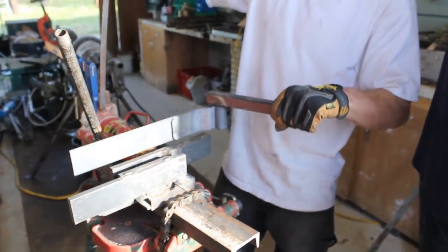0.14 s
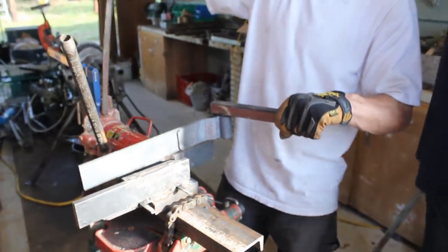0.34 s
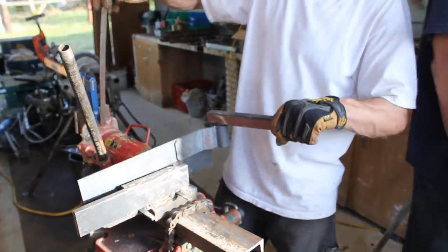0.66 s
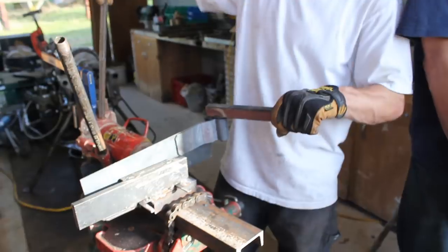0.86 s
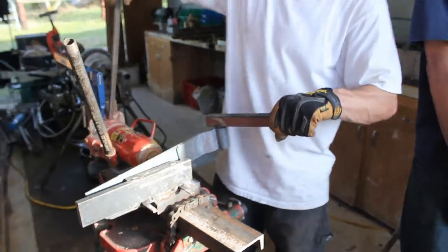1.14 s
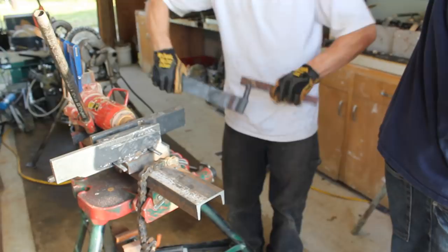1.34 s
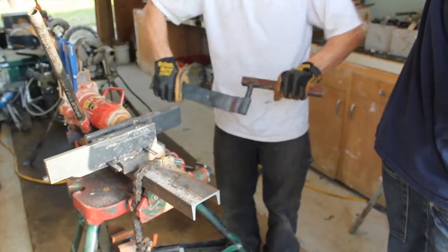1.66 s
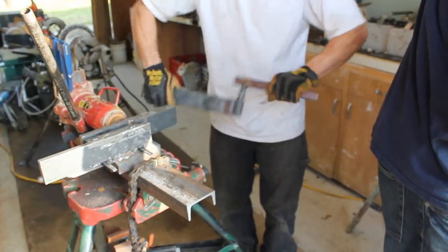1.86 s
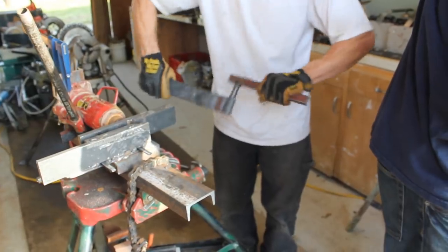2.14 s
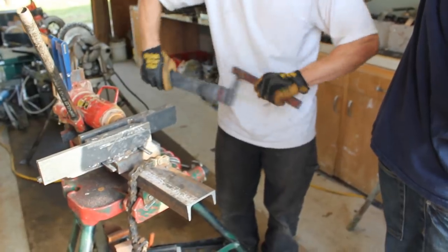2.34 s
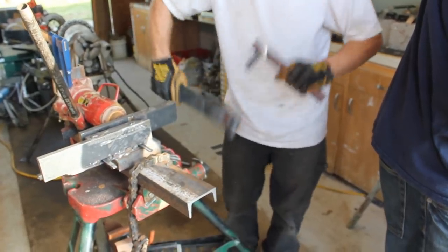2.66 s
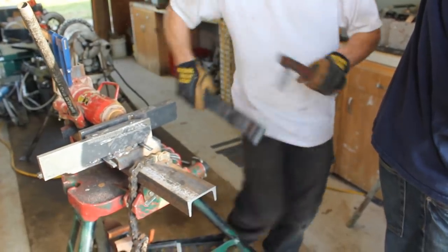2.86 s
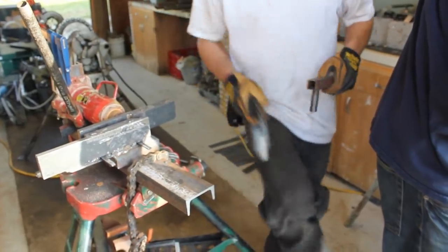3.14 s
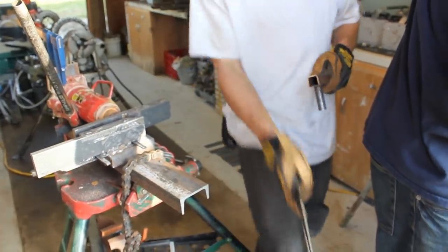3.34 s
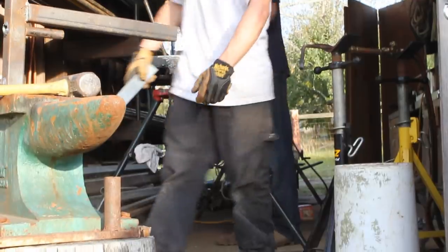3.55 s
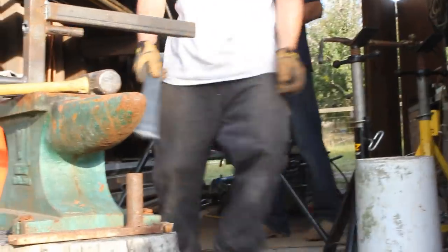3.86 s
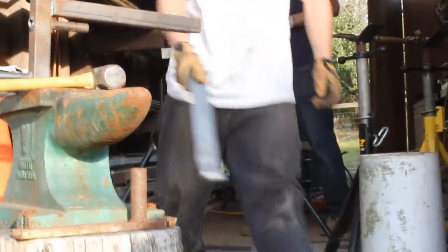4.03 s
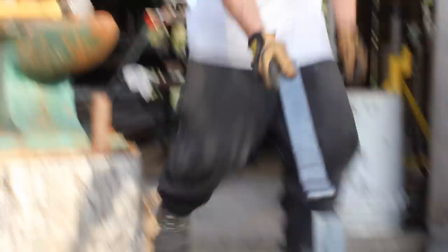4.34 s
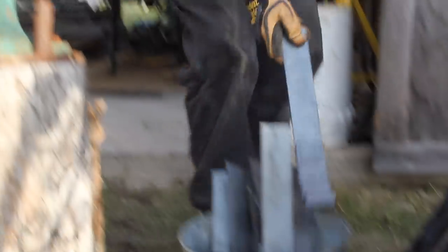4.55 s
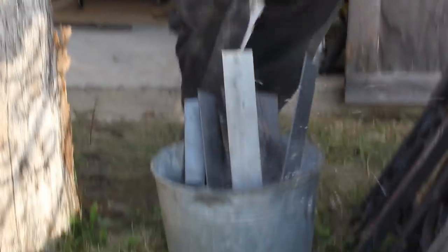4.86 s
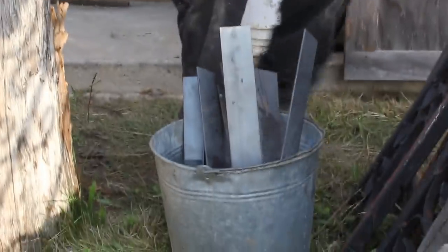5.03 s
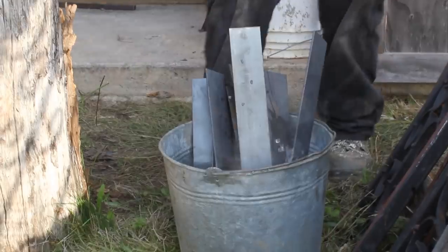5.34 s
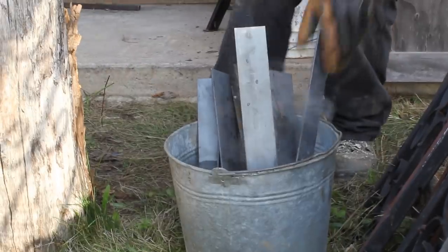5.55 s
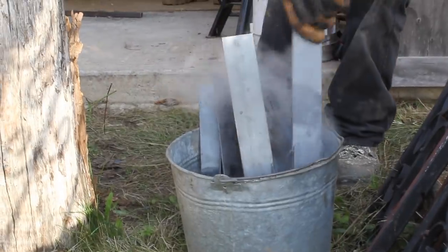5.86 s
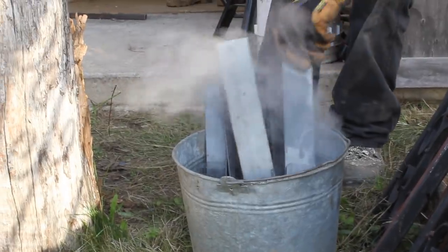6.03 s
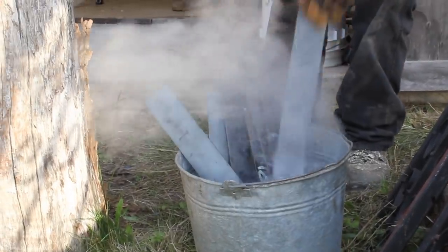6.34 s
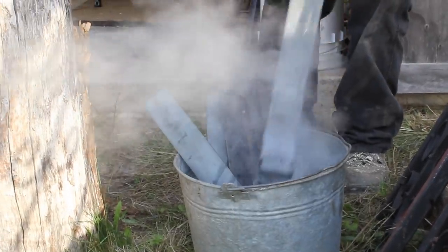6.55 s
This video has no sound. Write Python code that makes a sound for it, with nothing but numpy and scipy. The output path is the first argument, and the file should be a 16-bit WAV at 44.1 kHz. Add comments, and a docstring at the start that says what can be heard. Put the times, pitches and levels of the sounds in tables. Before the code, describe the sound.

After a steady gas jet stops abruptly, hot steel hisses, bubbles and crackles in water, knocking against a metal bucket.

```python
"""A workshop, close to a metal bucket of water, heard through one microphone. A loud gas jet hisses;
an edit cuts to water spitting faintly on hot steel. The steel is plunged in: a flash of steam,
swelling boil and sizzle, knocks on the bucket that duck the hiss, short squeals as the vapour film
flutters and sputters as it collapses. Another edit cuts from the boiling to a quiet hum with a few
light taps of tools."""
import sys
import numpy as np
from scipy import signal
from scipy.fft import rfft, irfft
from scipy.io import wavfile

SR = 44100
rng = np.random.default_rng(int(sys.argv[2]) if len(sys.argv) > 2 else 0)


def waveform_to_disk(signal):
    """Save audio, clipped to [-1, 1], as 16-bit WAV at the path in sys.argv[1]."""
    frames = np.transpose(np.atleast_2d(signal))
    scaled = np.clip(frames, -1, 1) * 32767
    samples = np.round(scaled).astype(np.int16)
    wavfile.write(sys.argv[1], SR, samples)


N = 295470
TIME = np.arange(N) / SR
FREQ = np.arange(N // 2 + 1) * SR / N + 1e-3
CUT_TO_WORK_S, FLASH_S, PLUNGE_S, CUT_TO_QUIET_S = 1.043, 2.1618, 2.324, 5.514

# hiss of escaping steam: f/Hz, relative level/dB
STEAM_SPECTRUM = [(4500, -4.5), (6500, -4), (8200, -3.5), (10000, -2), (12500, 0), (14000, -3.5),
                  (15800, -6.5)]
# steel striking the bucket: t/s, strength/dB, thud relative to strength/dB, clatter t60/s
BUCKET_KNOCKS = [(2.328, -27, -7, 0.11), (3.4181, -11.5, -25, .15), (3.686, -19, -30, 0.084),
                 (3.7421, -5.5, -19, 0.073), (4.227, -17.5, -5.5, 0.29), (4.2617, -12, -14.5, 0.079),
                 (4.364, -38, -23, 0.056), (4.6, -11, -12, 0.079), (4.6392, -23, -14, 0.16),
                 (5.267, -30, -10, .04)]


def from_db(db):
    """Decibels to gain."""
    return 10 ** (np.asarray(db) / 20)


def rms_one(x):
    """Scale to unit rms."""
    return x / np.sqrt(np.mean(x ** 2) + 1e-20)


def gains(rows):
    """One gain curve over time for each dB column."""
    times, *columns = np.transpose(rows)
    return [from_db(np.interp(TIME, np.sort(times), db)) for db in columns]


def white():
    """Fresh white noise."""
    return rng.standard_normal(N)


def drift(rate_hz):
    """A random wavering of unit rms, mostly slower than rate_hz."""
    knots = rng.standard_normal(4000)
    return rms_one(np.interp(TIME * rate_hz * 2, np.arange(len(knots)), knots))


def bell(hz, width_hz):
    """Gain of a steep-sided resonance."""
    return 1 / (1 + ((FREQ ** 2 - hz ** 2) / (np.pi / 2 * FREQ * width_hz)) ** 2)


def shape(spectrum, peaks=()):
    """Gain by frequency: a broad spectrum, lifted by resonances."""
    hz, db = np.transpose(spectrum)
    roll_off = np.minimum(1, np.minimum(FREQ / hz[0], hz[-1] / FREQ)) ** 2
    lift_db = sum(lift * np.exp(-np.minimum((2 * (FREQ - centre) / width) ** 2 * np.log(2), 20))
                  for centre, width, lift in peaks)
    return roll_off * from_db(np.interp(np.log(FREQ), np.log(hz), db) + lift_db)


def colour(x, response):
    """Filter a steady source and scale it to unit rms."""
    return rms_one(irfft(rfft(x) * response, N))


def gate(start, end, edge_s):
    """On between two moments, with sloping edges."""
    return np.clip(np.minimum(TIME - start, end - TIME) / edge_s + .5, 0, 1)


def decay(start, t60):
    """A sudden rise that dies away."""
    out, first = np.zeros(N), int(start * SR)
    age = TIME[:min(SR, N - first)]
    rise = 1 - np.exp(-age / .0004)
    out[first:first + len(age)] = rise * np.exp(-np.log(1000) * age / t60)
    return out


def swell(start, attack_s, hold_s, fall_db_per_s):
    """Attack, hold, and a release that falls evenly in dB."""
    age = TIME - start
    return np.clip(age / attack_s, 0, 1) * from_db(-fall_db_per_s * np.maximum(age - hold_s, 0))


def reflections(share, decay_s):
    """Nearby hard surfaces comb the spectrum with a fine ripple."""
    echoes = white() * np.exp(-TIME / decay_s)
    return 1 + share * rfft(echoes / np.sqrt(np.sum(echoes ** 2)))


def bubbles(per_s, spread_db, rush):
    """Tiny bubbles burst in random clumps around a base rate, over a smooth rush."""
    born = rng.random(N) < per_s * from_db(3 * drift(40)) / SR
    sizes = from_db(spread_db * np.minimum(rng.exponential(1, N), 4)) * rng.choice([-1, 1], N)
    return rms_one(born * sizes) + rush * white()


def quiet_room():
    """Room tone after the second cut: faint air, a thin high hiss and a wavering mains hum."""
    # the still room: f/Hz, relative level/dB
    spectrum = [(18, -54), (30, -33), (59, -15), (117, -10), (130, -12), (141, -13), (174, -15.5),
                (402, -16.5), (483, -20.5), (1610, -25), (3280, -30), (4490, -25), (5390, -31),
                (12800, -34.5), (15800, -33.5)]
    # its two bands: t/s, low level/dB, high level/dB
    band_levels = [(5.52, -57.5, -55), (5.85, -54.5, -54.5), (6.1, -55.5, -54.5), (6.7, -52, -55.5)]
    low_level, high_level = gains(band_levels)
    treble_share = 1 / (1 + (2500 / FREQ) ** 4)
    air = low_level * colour(white(), shape(spectrum) * np.sqrt(1 - treble_share))
    hiss = high_level * colour(white(), shape(spectrum, [(4600, 420, 3)]) * np.sqrt(treble_share))
    hum = from_db(-58 + 2.2 * drift(8)) * np.sin(2 * np.pi * 117.5 * TIME + 0.85 * drift(4.9))
    return air + hiss + hum


def working_room():
    """Room tone behind the steel: air and a beating machine hum."""
    # workshop air: f/Hz, relative level/dB
    spectrum = [(18, -52), (30, -35), (71, -5.5), (156, -3), (220, -8.5), (309, -8.5), (392, -9.5),
                (459, -8), (581, -11.5), (1240, -5.5), (2730, -15.5), (4370, -22.5), (11500, -33.5),
                (15800, -36)]
    # machine tones: f/Hz, level/dB
    tones = [(70.5, -55), (78, -56.5)]
    air = from_db(-41.5) * colour(white(), shape(spectrum))
    hum = sum(from_db(db) * np.sqrt(2) * np.sin(2 * np.pi * hz * TIME + 0.93 * drift(1.5))
              for hz, db in tones)
    return air + hum


def tool_taps():
    """Short dull rustles and ticks of tools being handled."""
    # light contacts: t/s, level/dB, f/Hz, t60/s
    taps = [(1.111, -35.5, 3200, 0.22), (1.12, -35, 220, 0.32), (1.668, -34.5, 169, 0.3),
            (1.712, -35.5, 2780, 0.074), (1.735, -39, 3000, 0.076), (1.761, -22, 9100, 0.014),
            (2.031, -39, 2200, 0.25), (2.11, -35, 700, 0.069), (5.943, -52.5, 3000, 0.27),
            (6.251, -48.5, 2400, .09), (6.474, -51, 1500, .12)]
    source = rfft(white())
    return sum(from_db(db) * decay(start, t60) * rms_one(irfft(source * bell(hz, 0.86 * hz), N))
               for start, db, hz, t60 in taps)


def gas_jet():
    """Turbulent gas noise with steady resonances, coloured by nearby surfaces."""
    # strength of the jet: t/s, level/dB
    levels = [(0.02, -16), (0.222, -17), (0.266, -15.5), (0.924, -17), (1.02, -15.5)]
    # turbulence: f/Hz, relative level/dB
    spectrum = [(40, -38), (90, -25), (140, -9), (205, -12.5), (250, -4.5), (420, -9), (560, -1), (730, -7),
                (1400, -7.5), (1800, -5.5), (2100, -6.5), (5500, -8), (8000, -5.5), (12600, 0), (15800, -5)]
    # resonances: f/Hz, width/Hz, lift/dB
    peaks = [(255, 40, 8), (307, 25, 6), (352, 28, 10), (496, 38, 10.5), (628, 45, 7), (685, 20, 5),
             (826, 32, 10), (975, 80, 6), (1084, 28, 13), (1230, 35, 5), (1315, 28, 7), (1530, 35, 5),
             (1620, 25, 7), (1700, 24, 12), (2160, 28, 8), (2320, 50, 7), (2495, 100, 7), (3012, 36, 10),
             (3260, 40, 7), (3780, 45, 6), (4020, 50, 7), (5990, 36, 8)]
    level, = gains(levels)
    ripple = reflections(share=.25, decay_s=.025)
    return level * colour(white(), shape(spectrum, peaks) * ripple)


def spitting():
    """Water spits on the hot steel in fits, with a faint fizz between them."""
    # fits before the plunge: t/s, length/s, level/dB
    fits = [(1.09, 0.11, -44.5), (1.303, .07, -45.5), (1.397, .21, -42.5), (1.703, .1, -49),
            (1.98, .08, -43.5), (2.09, 0.018, -44)]
    # spitting water: f/Hz, relative level/dB
    spectrum = [(1180, -33), (2000, -13), (3000, -16), (3330, -7), (4100, -6), (7510, -6.5), (14200, -2.5),
                (15800, -9)]
    envelopes = [from_db(db) * swell(start, 0.017, length, fall_db_per_s=110)
                 for start, length, db in fits]
    level = np.hypot(np.max(envelopes, axis=0), from_db(-56))
    return level * colour(bubbles(per_s=3000, spread_db=5, rush=0.99), shape(spectrum))


def steam_flash():
    """First contact boils the water explosively: a roar, ringing steel, a hollow splash, a thump."""
    # roar of steam: f/Hz, relative level/dB
    roar_spectrum = [(59, -64), (100, -37), (261, -13), (434, -14), (505, -11.5), (657, -22.5), (808, -10),
                     (1050, 0), (1220, -13), (1560, -3), (2550, -3.5), (2800, 0), (9000, -17), (11700, -48),
                     (19800, -120)]
    # ringing of the shocked steel: f/Hz, width/Hz, lift/dB
    steel_peaks = [(6130, 300, 7), (6830, 250, 5), (8250, 200, 8), (9950, 140, 2), (10600, 170, 11),
                   (11940, 330, 17), (13140, 350, 10), (14560, 120, 5)]
    fizz_spectrum = [(3500, -6), (6000, -7), (9000, -10), (13000, -12), (15800, -16)]
    attack_s = 0.0026
    roar_level = from_db(-14) * swell(FLASH_S, attack_s, hold_s=0.039, fall_db_per_s=251)
    fizz_level = from_db(-21) * swell(FLASH_S, attack_s, hold_s=0.04, fall_db_per_s=800)
    crack_level = from_db(-8.5) * decay(FLASH_S + attack_s / 2, t60=0.035)
    roar = roar_level * colour(white(), shape(roar_spectrum, [(3600, 330, 2.7), (4540, 600, 7.4)]))
    fizz = (fizz_level + crack_level) * colour(white(), shape(fizz_spectrum, steel_peaks))
    wisp = from_db(-36) * swell(FLASH_S, .02, 0.095, 100) * colour(white(), shape(STEAM_SPECTRUM))
    splash = from_db(-28) * swell(2.19, 0.0043, 0.087, 400) * colour(white(), bell(940, 640))
    thump = from_db(-20) * decay(FLASH_S + attack_s, t60=0.026) * colour(white(), bell(260, 330))
    return roar * from_db(1.5 * drift(70)) + fizz + wisp + splash + thump


def vapour_bursts():
    """The vapour film collapses in fits, from broad sputters to held hollow notes."""
    # collapses: t/s, length/s, f/Hz, width/Hz, level before wavering/dB
    bursts = [(2.192, 0.015, 840, 450, -25), (2.207, 0.024, 3040, 800, -20.5),
              (2.55, 0.72, 4380, 380, -35.5), (2.596, 0.69, 1550, 150, -37),
              (3.103, 0.18, 3100, 500, -32.5), (3.375, 0.034, 1400, 1800, -28),
              (3.421, 0.037, 1200, 600, -23.5), (3.93, 0.15, 5550, 500, -31),
              (3.93, 0.12, 3530, 250, -32.5), (4.259, .025, 1650, 800, -19), (4.451, 0.012, 4500, 500, -22),
              (4.542, 0.066, 3870, 4400, -19.5), (4.582, 0.018, 3180, 604, -20.5),
              (4.747, 0.61, 1210, 220, -37.5), (4.777, 0.54, 3680, 400, -35.5),
              (4.934, 0.023, 1920, 1000, -24), (5.04, 0.041, 3550, 2210, -23.5),
              (5.153, 0.031, 3020, 3000, -26), (5.17, 0.52, 190, 150, -42), (5.263, 0.012, 2320, 900, -21),
              (5.335, 0.024, 3600, 1200, -30), (5.451, 0.017, 2980, 1500, -22.5),
              (5.503, 0.012, 1610, 1200, -24.5)]
    out, source = np.zeros(N), rfft(white())
    waver_db_per_s = 2.8 * drift(18)   # longer bursts waver more
    for start, length, hz, width_hz, db in bursts:
        window = gate(start, start + length, 0.011) * from_db(waver_db_per_s * length)
        tone = irfft(source * bell(hz, width_hz), N) * window
        out += from_db(db) * tone * np.sqrt(np.sum(window ** 2) / np.sum(tone ** 2))
    return out


def steel_squeals():
    """When the vapour film flutters evenly, the steel sings a slightly unsteady note."""
    # squeals: t/s, length/s, f/Hz, level/dB
    notes = [(4.028, .007, 3480, -19), (4.544, 0.026, 4580, -23.5), (4.555, .015, 10600, -28),
             (4.577, 0.023, 4900, -17.5), (4.581, 0.019, 7940, -19.5)]
    flutter = .004 * drift(150)
    clock = TIME + np.cumsum(flutter) / SR
    return sum(from_db(db) * np.sqrt(2) * gate(t, t + length, 0.0036) * np.sin(2 * np.pi * hz * clock)
               for t, length, hz, db in notes)


def bucket_knocks():
    """Each knock is a crack, a duller clatter, a thud in the water and the damped ring of the wall."""
    # steel on the bucket: f/Hz, relative level/dB
    spectrum = [(150, -13), (300, -11), (550, -5.5), (950, -2.5), (1700, -2), (2200, -4.5), (3200, -2.5),
                (5000, -7), (8000, -9), (15000, -14)]
    # ringing of the wall: f/Hz, relative level/dB, t60/s
    wall_modes = [(335, -19, 0.1), (593, -17, 0.19), (837, -13.5, 0.11), (950, -10, 0.16),
                  (1201, -12.5, 0.16), (1690, -7, 0.065), (2730, -26, 0.01), (3450, -3, 0.027)]
    crack = from_db(4) * colour(white(), shape(spectrum))
    clatter = from_db(-1) * colour(white(), shape(spectrum) / np.hypot(1, FREQ / 3000))
    water = colour(white(), bell(330, 166))
    out, blows = np.zeros(N), np.zeros(N)
    for start, db, thud_db, t60 in BUCKET_KNOCKS:
        thud = from_db(thud_db) * water * decay(start, 0.11)
        out += from_db(db) * (crack * decay(start, 0.019) + clatter * decay(start, t60) + thud)
        blows[int(start * SR)] = from_db(db)
    for hz, db, t60 in wall_modes:
        radius, angle = np.exp(-np.log(1000) / (t60 * SR)), 2 * np.pi * hz / SR
        drive = blows * from_db(db + 1.24 * white()) * rng.choice([-1, 1]) + 1e-18
        out += signal.lfilter([0, np.sin(angle)], [1, -2 * radius * np.cos(angle), radius ** 2], drive)
    low_cut = signal.butter(2, 190, "high", fs=SR, output="sos")   # a small bucket radiates no bass
    return signal.sosfilt(low_cut, out)


def wander(x, depth_db, width_hz, hold_s):
    """Resonances come and go as the cavities of vapour change shape."""
    hz, times, spectra = signal.stft(x, SR, nperseg=1024)
    field = rng.standard_normal(spectra.shape)
    for axis, pole in enumerate([np.exp(-hz[1] / width_hz), np.exp(-times[1] / hold_s)]):
        field = signal.filtfilt([1 - pole], [1, -pole], field, axis=axis, padtype="even")
    gain = from_db(depth_db * np.clip(rms_one(field), -2.5, 2.5))
    return rms_one(signal.istft(spectra * gain, SR)[1][:N])


def dip_db():
    """The hiss sinks in lulls, and ducks after each knock as when a gain control dips and recovers."""
    # lulls in the boiling: t/s, length/s, depth/dB
    lulls = [(2.983, 0.12, 2.5), (3.46, 0.17, 2), (4.3, 0.18, 1), (4.65, 0.092, 10.5), (4.89, .03, 1.5),
             (4.992, .045, 2), (5.09, 0.039, 1.5), (5.205, .025, 3), (5.28, 0.05, 3.5), (5.376, 0.11, 7.5)]
    duck_db, recovery_s = 13.5, 0.16   # for a full-scale knock
    pauses = sum(db * gate(start, start + length, .028) for start, length, db in lulls)
    ducks = sum(from_db(db) * (TIME > start) * np.clip(1 - (TIME - start) / recovery_s, 0, 1)
                for start, db, *_ in BUCKET_KNOCKS)
    return pauses + duck_db * ducks


def course(height_db, swell_db, climb_db_per_s, fade_db_per_s, dip_share):
    """Gain of one voice of the quench: it swells as the steel goes under, climbs, fades as it cools."""
    swell_s, height_s = 0.22, 3.75
    wetting = swell_db * np.exp(-np.maximum(TIME - PLUNGE_S, 0) / swell_s)
    climbing = climb_db_per_s * np.maximum(height_s - TIME, 0)
    cooling = fade_db_per_s * np.maximum(TIME - height_s, 0)
    return from_db(height_db - wetting - climbing - cooling - dip_share * dip_db())


def quench():
    """Large bubbles boil in the bucket, small ones crackle on the steel, and steam hisses off."""
    # large bubbles: f/Hz, relative level/dB
    boil_spectrum = [(70, -25), (140, -5), (220, -7), (430, -5.5), (620, -3), (800, -7), (1000, 3),
                     (1300, 0.5), (2000, -0.5), (2600, -2.5), (3800, -19)]
    # small bubbles: f/Hz, relative level/dB
    sizzle_spectrum = [(1200, -35), (2000, -2.5), (2700, 0), (3600, -1), (4700, 1), (5300, -2.5),
                       (6800, -2), (8500, -3), (12000, -23)]
    # hollow resonances of the bucket: f/Hz, width/Hz, lift/dB
    bucket_air = [(312, 130, 8), (656, 260, 6), (1037, 48, 1), (1040, 190, 3), (1590, 61, 4),
                  (1805, 130, 4), (2930, 120, 7), (3530, 390, 6), (4370, 250, -1.5)]
    boil_level = course(-28, swell_db=13, climb_db_per_s=2, fade_db_per_s=0.85, dip_share=0.3)
    sizzle_level = course(-26, swell_db=6, climb_db_per_s=3, fade_db_per_s=1.4, dip_share=0.8)
    steam_level = course(-20.5, swell_db=3, climb_db_per_s=4, fade_db_per_s=7.5, dip_share=1)
    # an unbroken vapour film hushes the large bubbles and drives off extra steam
    film = gate(3.91, 4.14, edge_s=.15)
    boil_level *= from_db(-13 * film)
    steam_level *= from_db(1.5 * film)
    sizzle_level *= from_db(drift(30))
    walls = reflections(share=.3, decay_s=.02)
    surge = from_db(0.34 * drift(30))
    crackle = bubbles(per_s=2500, spread_db=4, rush=.6)
    boil = colour(bubbles(per_s=2300, spread_db=0.5, rush=0.87), shape(boil_spectrum, bucket_air) * walls)
    sizzle = colour(crackle, shape(sizzle_spectrum, bucket_air) * walls)
    steam = colour(bubbles(per_s=6500, spread_db=-2, rush=0.39), shape(STEAM_SPECTRUM) * walls)
    boiling = boil_level * wander(boil, depth_db=2, width_hz=17, hold_s=0.11)
    sizzling = sizzle_level * wander(sizzle, depth_db=3, width_hz=48, hold_s=0.058)
    steaming = steam_level * wander(steam, depth_db=1.5, width_hz=50, hold_s=0.051)
    return (boiling + sizzling + steaming) * surge * gate(PLUNGE_S, 7, 0.0086)


def scene():
    """Two hard edits join jet, steelwork and quiet room, in mono, with tool taps on top."""
    work = working_room() + spitting() + steam_flash() + quench()
    work += vapour_bursts() + steel_squeals() + bucket_knocks()
    mono = gas_jet() * gate(-1, CUT_TO_WORK_S, .001)
    mono += work * gate(CUT_TO_WORK_S, CUT_TO_QUIET_S, .001)
    mono += quiet_room() * gate(CUT_TO_QUIET_S, 7, .001)
    return np.tile(mono + tool_taps(), (2, 1))


def record(dry):
    """The microphone chain rounds the loudest peaks and cuts the top."""
    rounded = 1.394 * np.tanh(dry / 1.39)
    high_cut = signal.ellip(12, .1, 80, 15900, fs=SR, output="sos")
    return signal.sosfilt(high_cut, rounded)


dry = scene()
out = record(dry)
waveform_to_disk(out)
```